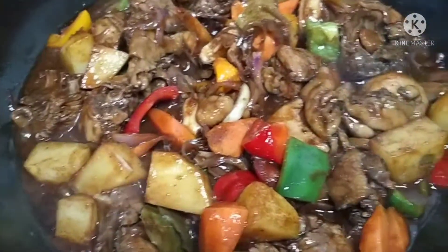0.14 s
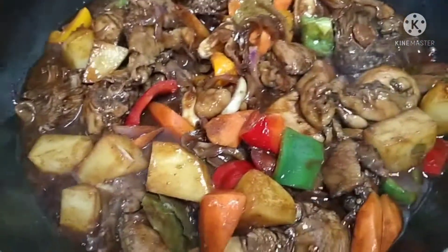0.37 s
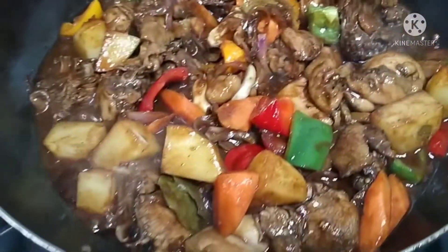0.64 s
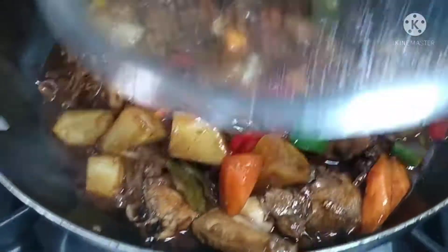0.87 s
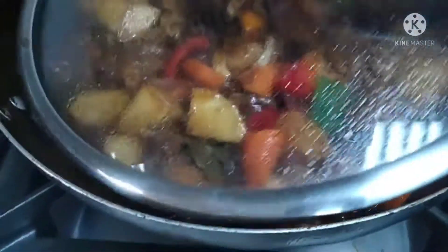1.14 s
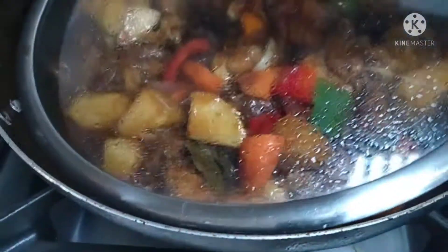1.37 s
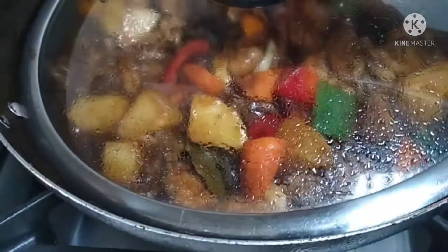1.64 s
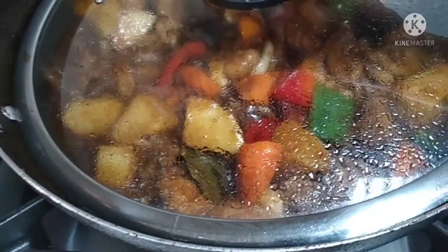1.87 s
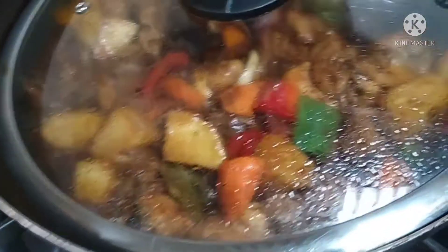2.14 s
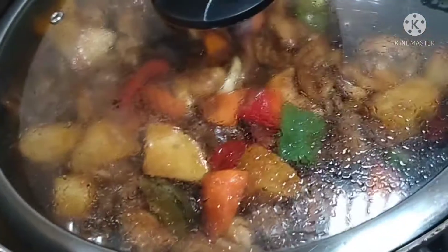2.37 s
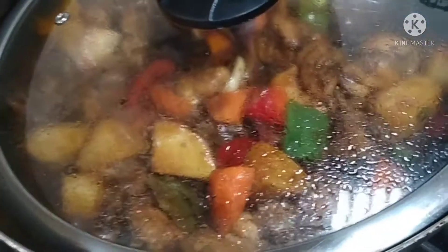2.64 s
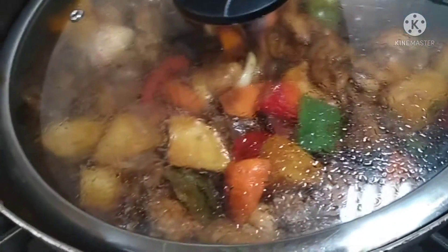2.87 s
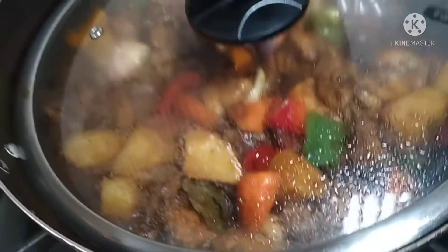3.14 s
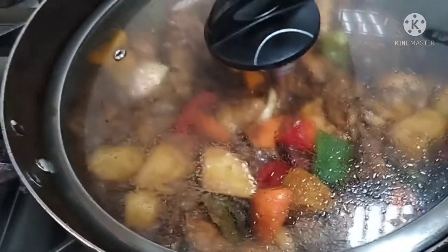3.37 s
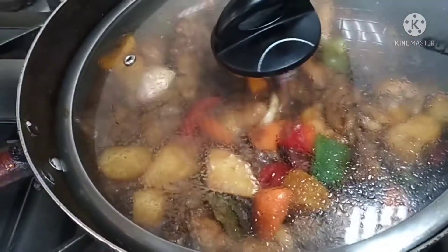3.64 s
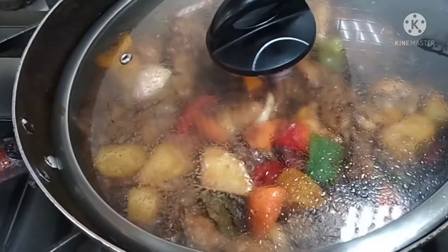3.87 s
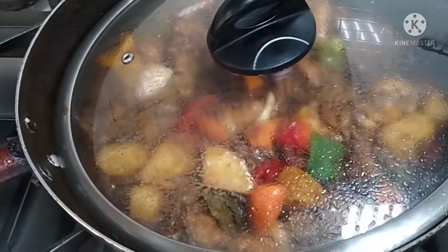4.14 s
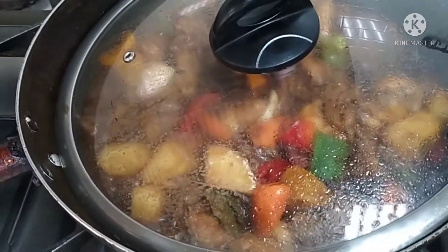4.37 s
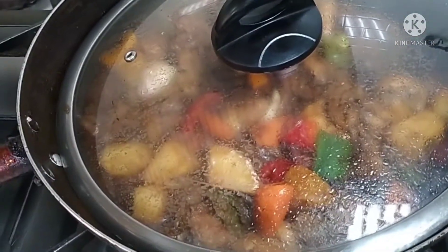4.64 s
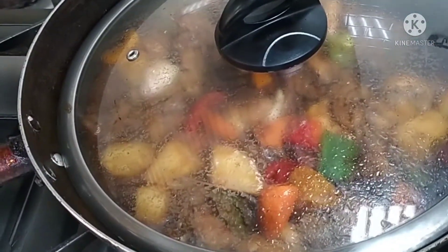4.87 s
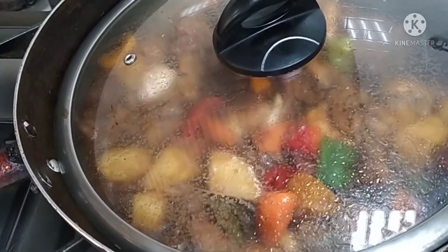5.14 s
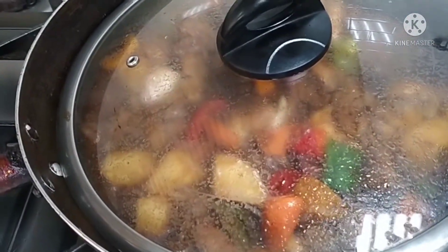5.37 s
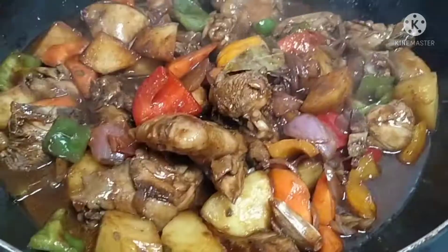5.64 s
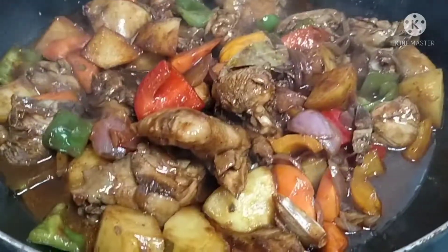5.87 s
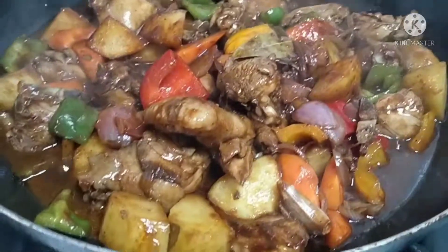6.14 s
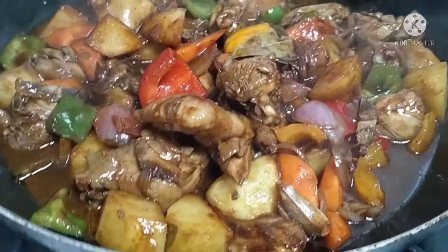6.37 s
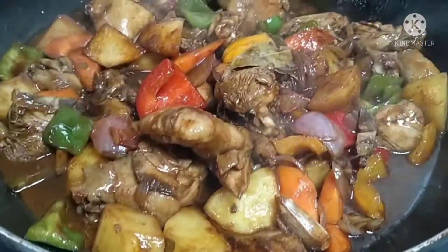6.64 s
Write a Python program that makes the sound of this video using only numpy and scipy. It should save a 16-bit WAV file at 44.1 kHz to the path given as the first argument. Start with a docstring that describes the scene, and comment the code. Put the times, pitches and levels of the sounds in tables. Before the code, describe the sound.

A pan of food bubbles and fizzes on a stove, heard very near. Early on a glass lid taps the metal rim with brief bright rings, and lowering it softens the crackle into a hollow gurgle. Hiss returns as the microphone draws back, with hollow pops, ticks of fat and steam puffs. After half a second of silence, a quieter simmer slowly swells over electrical hum.

```python
"""A stew simmers in a wide covered pan, close to a phone microphone in a kitchen: patchy noise and small ringing
bubbles, shaped by the air under a glass lid, with fizz, crackle and spitting fat escaping at the rim.
The lid, a sum of decaying tones, clinks on the rim and is lowered; drops sputter on hot metal as noise puffs.
After a short silence the open pan is heard from further off, the recorder still settling.
Behind both stands the mains hum of an appliance, sines and a low drone; behind the first, a noise rumble."""
import sys
import numpy as np
from scipy import signal
from scipy.fft import rfft, irfft, next_fast_len
from scipy.io import wavfile
from scipy.ndimage import uniform_filter1d, map_coordinates

SR = 44100
rng = np.random.default_rng(int(sys.argv[2]) if len(sys.argv) > 2 else 0)


def store_wav(level_fs):
    """Save 16-bit WAV to argv[1]."""
    pcm = np.round(np.clip(np.atleast_2d(level_fs), -1, 1) * 32767)
    wavfile.write(sys.argv[1], SR, pcm.T.astype(np.int16))


def voltage_ratio(level):
    """Linear amplitude factor for a level in decibels (scalar or array-like)."""
    return 10 ** (np.asarray(level, float) / 20)


N = 298116
TIME = np.arange(N) / SR
FIRST_ENDS_S, SECOND_STARTS_S = 5.6143, 6.087  # the silence lies between


def unit(x):
    """x at rms 1."""
    return x / np.sqrt(np.mean(x ** 2) + 1e-20)


def white():
    """White noise as long as the scene."""
    return rng.standard_normal(N)


def curves(rows):
    """One value per sample for each column after the time."""
    s, *columns = np.transpose(rows)
    return [np.interp(TIME, s, column) for column in columns]


def wobble(rate):
    """A smooth random curve, rate knots a second."""
    return map_coordinates(rng.standard_normal(N // 100), [TIME * np.clip(rate, .1, 400)])


def filtered(x, response):
    """x times a response of frequency, at rms 1."""
    m = next_fast_len(N + 8192)
    spectrum = rfft(x, m) * response(np.fft.rfftfreq(m, 1 / SR))
    return unit(irfft(spectrum, m)[:N])


def colour(points):
    """The gain of (frequency [Hz], gain [dB]) points on a log axis."""
    f, db = np.transpose(points)
    return lambda hz: voltage_ratio(np.interp(np.log(hz + 1), np.log(f + 1), db))


def ringing(s, db, hz, cycles, rise):
    """Damped sines from s on, falling to 1/e in some cycles while the pitch glides by the share rise."""
    t = np.arange(SR // 50) / SR
    u = t * (hz / cycles)[:, None]
    glide = 1 + np.reshape(rise, (-1, 1)) * (1 - np.exp(-4.5 * u))
    phase = 2 * np.pi * np.cumsum(hz[:, None] * glide, 1) / SR
    wave = np.sin(phase) * np.exp(-u) * (1 - np.exp(-8 * u))
    at = (s * SR).astype(int)[:, None] + np.arange(len(t))
    return np.bincount(at.ravel(), (voltage_ratio(db)[:, None] * wave).ravel(), N + SR)[:N]


def seething(count, mid_hz, octaves, cycles, spread_db, grain_db, patchy_db):
    """Patchy noise with small bursting bubbles on it, a few larger than the rest."""
    z = signal.stft(white(), nperseg=512)[2]
    field = uniform_filter1d(uniform_filter1d(rng.standard_normal(z.shape), 6, 0), 8, 1)
    noise = signal.istft(z * voltage_ratio(patchy_db * unit(field)), nperseg=512)[1][:N]
    when, size = rng.random((2, count))
    hz = np.clip(mid_hz * 2 ** (octaves * rng.standard_normal(count)), 200, 16000)
    size_db = np.minimum(-spread_db * np.log(size + 1e-9), 2.8 * spread_db)
    grains = ringing(when * N / SR, size_db, hz, cycles, rise=.15)
    return unit(noise) + voltage_ratio(grain_db) * unit(grains)


# how far the lid is down: (time [s], share [0-1])
LID_DOWN = [(0.3, 0), (0.85, 0.1), (1.2, 0.47), (1.7, 0.49)]
# how far the phone has drawn back over the lid: (time [s], share [0-1])
DRAWN_BACK = [(2.4, 0.01), (2.85, 0.24), (3.2, 0.7), (3.5, 0.75), (3.9, 0.86)]
# the sizzle turns fuller and less sharp at the end: (time [s], share [0-1])
FULLER = [(4.9, 0), (5.3, 0.9)]
# each layer by name: (open level [dB], change at share 1 of lid down, of phone drawn back, of fuller [dB])
LAYERS = dict(rumble=(-50, 1, -1, -0.5), air=(-51, 3, 5, -0.5), fizz=(-47, -7, 2, 3.5),
          crackle=(-54.5, -6.5, 4, 2.5), hiss=(-52.5, -7, 7, -4), finest=(-50, -6, 5.5, 1))
# gurgle under the lid: (time [s], level [dB])
GURGLE_LEVEL = [(0, -52.5), (.7, -51), (1.2, -49), (1.9, -49.5), (2.5, -55.5), (3.4, -57), (5.6, -60)]


def covered_pan():
    """Close by: bubbles excite the trapped air, fizz and spatter escape at the rim, over the kitchen's rumble."""
    shares = np.clip([np.ones(N), *curves(LID_DOWN), *curves(DRAWN_BACK), *curves(FULLER)], 0, 1)
    rumble_db, air_db, fizz_db, crackle_db, hiss_db, finest_db = np.array(list(LAYERS.values())) @ shares
    gurgle_db, = curves(GURGLE_LEVEL)
    boil = wobble(9)  # surges of boiling shared by all layers of the stew
    hiss, finest = spatter()
    sizzle = voltage_ratio(air_db + 0.5 * boil) * air_bubbles()
    sizzle += voltage_ratio(fizz_db + 0.89 * boil) * fizz()
    sizzle += voltage_ratio(crackle_db + 0.5 * boil) * crackle(shares[1])
    flicker = voltage_ratio(0.19 * boil + 1.0 * wobble(25))
    sizzle += flicker * (voltage_ratio(hiss_db) * hiss + voltage_ratio(finest_db) * finest)
    low = voltage_ratio(rumble_db + 0.62 * wobble(4.2)) * rumble() + voltage_ratio(gurgle_db + 0.47 * boil) * gurgle()
    return low + dipped(sizzle)


# resonances of the air under the lid: (frequency [Hz], width [Hz], level [dB])
TRAPPED = [(396.5, 30, 2.5), (914, 91, -0.5), (1350, 100, -0.5), (1781, 95, -1), (2262, 130, -4.5),
           (2670, 150, -6)]


def trapped_air(f):
    """Response of the air under the lid: band-pass resonances of alternating sign."""
    return sum((-1) ** k * voltage_ratio(db) * 1j * f * w / (c * c - f * f + 1j * f * w)
               for k, (c, w, db) in enumerate(TRAPPED))


def air_bubbles():
    """Many short bubbles ring the trapped air."""
    return filtered(seething(count=2500, mid_hz=1381, octaves=0.722, cycles=1.5,
                             spread_db=3, grain_db=-7, patchy_db=0), trapped_air)


# colour of the fizz: (frequency [Hz], gain [dB])
FIZZ = [(600, -34.5), (1100, -5.5), (2000, -3), (2750, -4.5), (3400, -9), (6000, -28.5)]


def fizz():
    """Dense noise with bubbles of nearly equal size escapes at the rim."""
    return filtered(seething(count=2000, mid_hz=2210, octaves=.5, cycles=2.8,
                             spread_db=.5, grain_db=-12.5, patchy_db=1.0), colour(FIZZ))


# colour of the crackle: (frequency [Hz], gain [dB])
CRACKLE = [(1800, -28), (3000, -4.5), (4000, -2.5), (5200, -5.5), (7000, -23)]


def crackle(lid_down):
    """Distinct crackles give way to a finer grain as the lid muffles the single ones."""
    crisp = filtered(seething(count=2500, mid_hz=3100, octaves=.22, cycles=3,
                              spread_db=3.2, grain_db=-4, patchy_db=.6), colour(CRACKLE))
    fine = filtered(seething(count=3000, mid_hz=3800, octaves=.4, cycles=2,
                             spread_db=2.5, grain_db=-10, patchy_db=.4), colour(CRACKLE))
    shut = np.pi / 2 * lid_down / lid_down.max()
    return np.cos(shut) * crisp + np.sin(shut) * fine


# colours of the hiss and of the finest spatter: (frequency [Hz], gain [dB])
HISS = [(3500, -26.5), (5200, -6), (6040, -1), (7380, 3.5), (8120, 0.5), (9050, -25), (11000, -26.5)]
FINEST = [(7500, -32.5), (9050, -13), (11400, -10.5), (13700, 0.5), (14500, 0.5), (15400, -4), (16500, -7)]


def spatter():
    """Very short high bursts, split into a hiss and a still higher band."""
    drops = seething(count=1500, mid_hz=10000, octaves=.5, cycles=1.5,
                     spread_db=3.6, grain_db=-12, patchy_db=1.2)
    return filtered(drops, colour(HISS)), filtered(drops, colour(FINEST))


# colour of the gurgle: (frequency [Hz], gain [dB])
GURGLE = [(250, -25), (480, -1), (800, 0.5), (1100, -7), (2500, -31.5)]


def gurgle():
    """Larger, lower bubbles ring in the stew."""
    return filtered(seething(count=600, mid_hz=702.0, octaves=.4, cycles=3,
                             spread_db=2.5, grain_db=-10, patchy_db=1), colour(GURGLE))


# a dip slides up the spectrum as the phone draws back: (time [s], centre [Hz], depth [dB])
DIP = [(2.85, 1890, 1), (3.1, 2150, 2.5), (3.3, 2460, 5.5), (3.5, 3000, 5.5), (3.72, 4400, 4),
       (4.1, 4300, 6), (5.6, 4740, 5.5)]
DIP_OCTAVES = 0.38  # distance at which the depth falls to 1/e


def dipped(x):
    """x with the sliding dip cut out of its spectrum."""
    hz, t, z = signal.stft(x, SR, nperseg=512)
    s, dip_hz, depth_db = np.transpose(DIP)
    off = np.log2((hz[:, None] + 1) / np.interp(t, s, dip_hz)) / DIP_OCTAVES
    cut_db = -np.interp(t, s, depth_db) * np.exp(-off ** 2)
    return signal.istft(z * voltage_ratio(cut_db), SR, nperseg=512)[1][:N]


# big bubbles: (time [s], level before the envelope [dB], starting pitch [Hz])
BUBBLES = [(0.327, -31, 1200), (0.4857, -35, 3300), (0.566, -35, 5700), (0.658, -44, 4600),
           (0.166, -38, 3700), (0.235, -36.5, 2700), (0.211, -35, 3320), (0.619, -29, 3240),
           (0.657, -33, 3070), (0.6917, -33, 3520), (0.544, -36.5, 2960), (0.596, -36, 3010),
           (0.767, -40, 2940), (0.7943, -39, 2700), (0.9152, -36.5, 4000), (0.824, -33, 1900),
           (1.309, -35.5, 890), (1.587, -32, 860), (2.859, -32.5, 3040), (2.931, -32.5, 2670),
           (2.9558, -34.5, 3320), (2.9593, -34, 3920), (3.3743, -32.5, 4340), (3.3997, -41, 3960),
           (4.278, -32.5, 1326), (3.087, -34, 880), (3.347, -31.5, 910), (3.389, -36, 930),
           (3.454, -29.5, 1720), (3.502, -30.5, 1730), (3.503, -35.5, 4560), (3.643, -24, 1330),
           (3.76, -27.5, 2603), (3.76, -37, 3330), (4.08, -39, 1330), (4.198, -39, 420), (4.198, -33, 940),
           (4.198, -31, 1350), (4.028, -31, 2330), (2.957, -40, 1390), (3.165, -39, 1450),
           (3.211, -37.5, 900), (3.549, -35.5, 1350), (5.262, -36.5, 1350), (5.575, -34, 1350),
           (4.3963, -28, 1370), (4.3955, -36.5, 2000), (4.848, -35.5, 1320), (4.978, -35, 860),
           (5.072, -38, 1410), (5.124, -35, 1360), (5.124, -30.5, 2310), (5.166, -42, 1350),
           (5.394, -41, 2880), (5.522, -34, 2995), (5.262, -26, 1770), (5.493, -31.5, 920)]
BUBBLE_CYCLES = 4.2  # decay to 1/e
SNAP_DB, SNAP_CYCLES = -4.5, 0.6  # the film tears; level relative to the bubble
AIR_ANSWER_DB = -1  # rms of the trapped air's ring relative to the snaps under the lid


def big_bubbles():
    """The film of each bubble snaps and the bubble rings; under the lid the snap also rings the trapped air."""
    s, db, hz = np.transpose(BUBBLES)
    rings = ringing(s, db, hz, BUBBLE_CYCLES, rise=0.019)
    snaps = ringing(s, db + SNAP_DB, hz, SNAP_CYCLES, rise=0.019)
    covered = snaps * np.clip(curves(LID_DOWN)[0], 0, 1)
    answer = voltage_ratio(AIR_ANSWER_DB) * np.std(covered) * filtered(covered, trapped_air)
    return rings + snaps + answer


# spits of fat: (time [s], level before the envelope [dB], starting pitch [Hz])
SPITS = [(0.21, -30, 6840), (0.2254, -36, 7160), (0.413, -21, 12900), (0.414, -33, 11400),
         (0.418, -35, 12700), (0.4245, -31, 12700), (0.4484, -31, 7300), (0.5075, -31, 7400),
         (0.5185, -33, 7400), (0.537, -35, 7200), (0.6265, -29, 14600), (0.628, -32, 11700),
         (0.7035, -27, 13700), (1.207, -22, 13900), (2.9485, -33, 12600), (2.9495, -33, 10800),
         (2.958, -29, 14800), (3.341, -38, 8600), (3.375, -24, 7640), (3.3755, -39, 6030),
         (4.118, -37, 7400), (4.397, -29, 7850), (4.8228, -19, 13600), (4.88, -28, 7000),
         (5.0694, -32, 7330), (5.0886, -23.5, 7500), (5.1721, -26, 14000), (5.302, -33, 6180),
         (5.5211, -26, 13560), (6.405, -38, 5600), (6.477, -39, 6490), (6.5142, -36, 7800),
         (6.53, -34, 5300), (6.531, -37, 6500), (6.09, -44, 5900), (6.198, -45, 7900), (6.266, -45, 5500),
         (6.278, -45, 5400), (6.297, -43, 5600), (6.469, -45, 7300), (6.672, -48, 8200), (6.706, -44, 5400),
         (6.722, -44, 5830), (6.739, -41, 5700)]


def fat_spits():
    """Each spit of fat is a high damped ring, down to 1/e in six cycles."""
    s, db, hz = np.transpose(SPITS)
    return ringing(s, db, hz, cycles=6, rise=0.019)


# lid on rim: (time [s], level [dB], ring [dB], rush [dB], brightness [dB per octave])
CLINKS = [(0.185, -28.5, -10, -2.5, -7), (0.2463, -23.5, -3.5, -3.5, 1), (.268, -33.5, -2.5, -10.5, -3.5),
          (.302, -30.5, -1, -16, -14)]
# tones of the glass lid: (frequency [Hz], level before brightness [dB], t60 [s])
LID = [(1270, -20, .1), (2420, -4, .04), (2510, -10, .3), (3290, -15, .15), (3607, -13, .16),
       (3680, 0, .035), (4414, -17.5, .25), (5636, -22, .2), (6891, -18, .25), (7250, -7, .035),
       (7510, -23, .25), (8630, -28, .2), (10780, -23, .08), (13550, -16, .17), (14590, -23, .12)]
# colour of the rush of drops: (frequency [Hz], gain [dB])
DROPS = [(200, -8.5), (700, -2.5), (2500, 1), (4300, -6), (5300, -14.5), (7600, -6.5), (9500, -12),
         (12000, -11.5), (14000, -3.5), (16000, -15)]
CONTACT_S = .0004  # time constant of the rim's bite
RUSH_TILT = 0.93  # share of a contact's brightness that its rush takes on


def lid():
    """Each contact on the rim rings the glass and shakes off a short rush of drops."""
    out, t = np.zeros(N), np.arange(SR // 3) / SR
    for s, db, ring_db, rush_db, bright_db in CLINKS:
        ring = np.zeros(len(t))
        for hz, level, t60 in LID:
            tone_db = level + bright_db * np.log2(hz / 2000) + rng.normal(0, 0.94) - 60 * t / t60
            # the lid rocks on the rim, blurring each tone
            shiver = .012 * np.cumsum(rng.standard_normal(len(t)))
            ring += voltage_ratio(tone_db) * np.sin(2 * np.pi * hz * t + shiver)

        def drop_colour(hz):
            """The drops' colour, tilted by the contact's brightness."""
            return colour(DROPS)(hz) * voltage_ratio(RUSH_TILT * bright_db * np.log2(1 + hz / 3000))

        at = round(s * SR)
        patter = filtered(white(), drop_colour)[at:at + len(t)]
        rush = patter * (voltage_ratio(-60 * t / 0.022) + 0.5 * voltage_ratio(-60 * t / 0.45))  # t60s [s]
        bite = 1 - np.exp(-t / CONTACT_S)
        out[at:at + len(t)] += voltage_ratio(db) * bite * (voltage_ratio(ring_db) * ring + voltage_ratio(rush_db) * rush)
    return out


# a drop falls as the lid first taps; its tones:
# (time [s], level before the envelope [dB], starting pitch [Hz], decay to 1/e [cycles], glide [share])
FALLING_DROP = [(0.1862, -19, 2600, 6, -.22), (.1846, -19, 4000, 2.7, -0.3),
                (.1848, -25, 1100, 1.196, -0.18)]


def falling_drop():
    """One drop falls, heard as three damped tones of falling pitch."""
    return ringing(*np.transpose(FALLING_DROP))


# a drop lands on hot metal and sputters: (time [s], starting level [dB], t60 [s])
SPUTTERS = [(1.311, -41.5, 0.13), (1.671, -45, .06), (2.951, -41.5, 0.18), (3.372, -48, .1),
            (2.931, -43, .03), (4.206, -48, .03), (4.07, -40, .15), (4.70, -40.5, 0.063),
            (5.072, -35.5, .05), (5.123, -37, .04), (5.26, -39, .04), (5.52, -42, 0.085), (6.314, -60, .03),
            (6.477, -58, .03), (6.512, -56, .05), (6.528, -58, .05)]


def sputters():
    """Short bright puffs of steam: noise that starts at once and dies away."""
    level = sum(voltage_ratio(db - 60 * np.clip(TIME - s, 0, 1) / t60) * (TIME > s) for s, db, t60 in SPUTTERS)
    return level * filtered(white(), colour(DROPS))


# an airy swell of steam at the rim: (time [s], level [dB])
SWELL = [(3.25, -79.5), (3.36, -63), (3.42, -53), (3.5, -63), (3.6, -80)]


def steam_swell():
    """Noise in the crackle's colour swells and sinks at the rim."""
    return voltage_ratio(curves(SWELL)[0]) * filtered(white(), colour(CRACKLE)) * (TIME < FIRST_ENDS_S)


# colour of the open pan from further off: (frequency [Hz], gain [dB])
SIMMER = [(70, -27.5), (130, -7), (250, -4), (400, -9), (1000, -5.5), (1500, -8), (3000, -8.5), (4400, -21),
          (6100, -18), (7500, -22), (8100, -24.5), (9000, -35), (10500, -33), (11300, -40), (11800, -52),
          (13600, -51), (14300, -41), (15400, -33)]
OPEN_SIMMER_DB, SIMMER_GROWS_DB_PER_S = -46, 3.5
SETTLE_DB, SETTLE_S = -6, 0.42  # how low the level starts, time constant of its recovery
OFFSET, DRAIN_S = -0.033, 0.9  # share of full scale at the start, time constant


def open_pan():
    """A duller simmer over hum; the level recovers and the offset drains as the recorder settles."""
    since = np.clip(TIME - SECOND_STARTS_S, 0, None)
    settle_db = SETTLE_DB * np.exp(-since / SETTLE_S)
    simmer_db = OPEN_SIMMER_DB + SIMMER_GROWS_DB_PER_S * since + settle_db
    grains = seething(count=3000, mid_hz=5600, octaves=0.3, cycles=2.6,
                      spread_db=6, grain_db=-9.5, patchy_db=0.0)
    simmer = voltage_ratio(simmer_db + 0.9 * wobble(12)) * filtered(grains, colour(SIMMER))
    # the hum resumes at another point of its cycle
    return simmer + hum(-35 + settle_db, leads_s=.0024) + OFFSET * np.exp(-since / DRAIN_S)


# overtones of the hum: (multiple of its frequency, level relative to it [dB])
OVERTONES = [(.5, -29.5), (2, -27), (2.5, -29), (4, -29), (4.5, -28.5)]
# colour of the drone: (frequency [Hz], gain [dB])
DRONE = [(15, -32), (28, 0), (48, -2.5), (66, -8.5), (90, -0.5), (130, -40.5)]
HUM_HZ = 100.05


def hum(db, leads_s=0):
    """Twice the mains frequency, with weak, slightly unsteady overtones and a low drone."""
    turn = 2 * np.pi * HUM_HZ * (TIME + leads_s)
    overtones = sum(voltage_ratio(level + 0.9 * wobble(10)) * np.sin(k * turn + 6 * rng.random())
                    for k, level in OVERTONES)
    drone = voltage_ratio(-21.5) * filtered(white(), colour(DRONE))  # the appliance shaking the worktop
    return voltage_ratio(db) * (np.sqrt(2) * (np.cos(turn) + overtones) + drone)


# colour of the kitchen's rumble: (frequency [Hz], gain [dB])
RUMBLE = [(60, -30), (115, 0.5), (200, -5.5), (300, -1), (450, -6), (800, -15), (2000, -37)]


def rumble():
    """Low rumble of the kitchen, perhaps a fan: coloured noise."""
    return filtered(white(), colour(RUMBLE))


# the sound sinks just before the silence: (time [s], level [dB])
FADE = [(5.57, 0), (5.613, -4)]


def scene():
    """The covered pan close by, a silence, the open pan from further off."""
    covered = covered_pan() + lid() + falling_drop() + hum(-33.4)
    first = (TIME < FIRST_ENDS_S) * voltage_ratio(curves(FADE)[0]) * covered
    second = (TIME >= SECOND_STARTS_S) * open_pan()
    bursts = big_bubbles() + fat_spits() + sputters() + steam_swell()
    return (first + second + bursts)[None]


def band_limit(x):
    """A steep low-pass at the top of the band."""
    return signal.sosfilt(signal.butter(12, 16140, fs=SR, output="sos"), x)


def record(dry):
    """The phone's microphone path rolls off steeply around 15500 Hz."""
    taps = signal.firwin(1023, 15500, window=("kaiser", 9), fs=SR)
    mix = signal.fftconvolve(dry, taps[None], "same", axes=1)
    return band_limit(mix)


dry = scene()
out = record(dry)
store_wav(out)
```